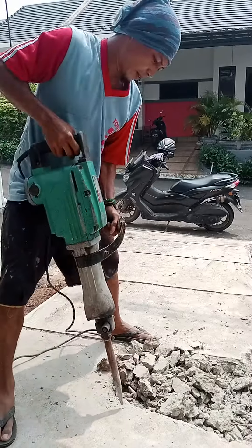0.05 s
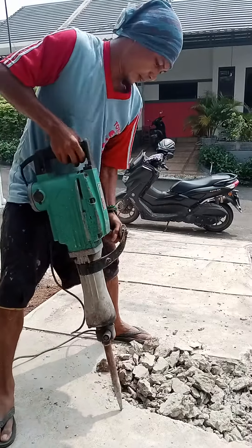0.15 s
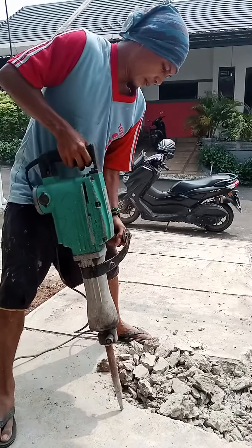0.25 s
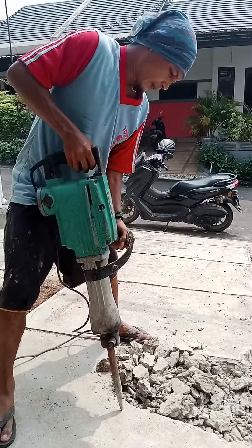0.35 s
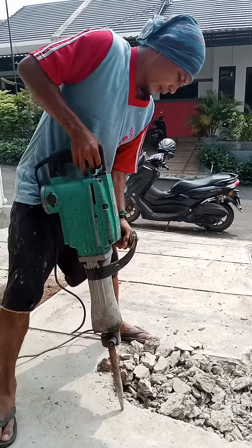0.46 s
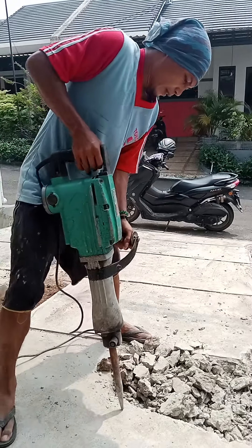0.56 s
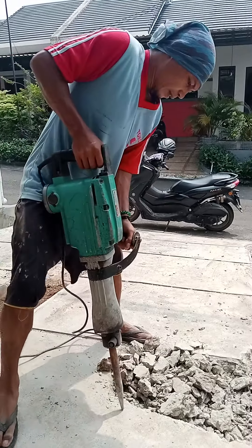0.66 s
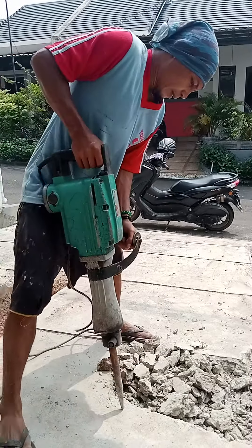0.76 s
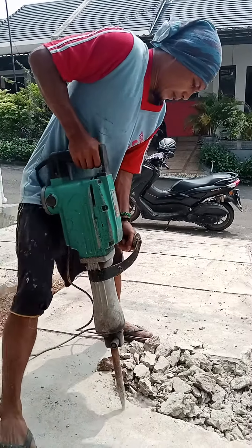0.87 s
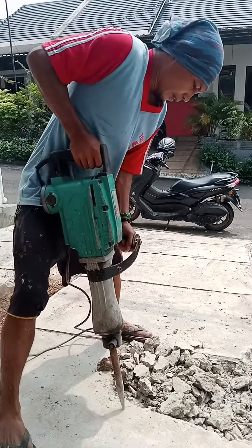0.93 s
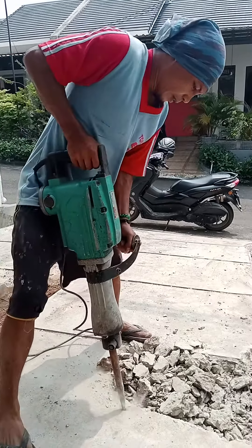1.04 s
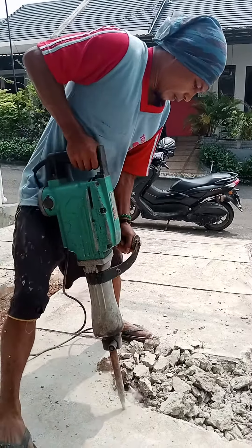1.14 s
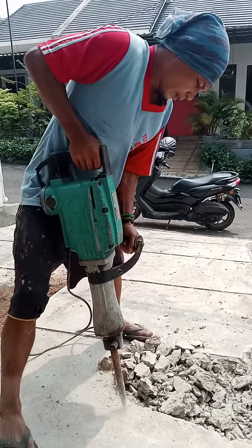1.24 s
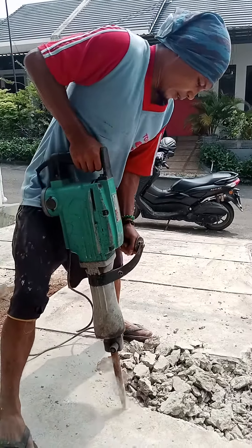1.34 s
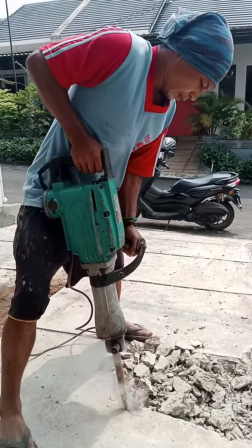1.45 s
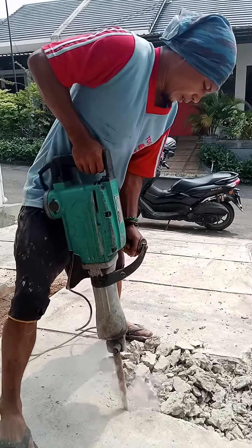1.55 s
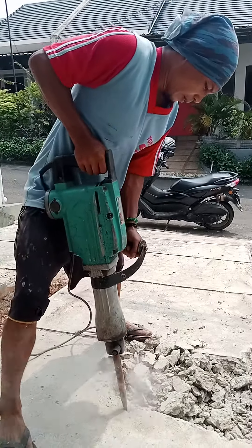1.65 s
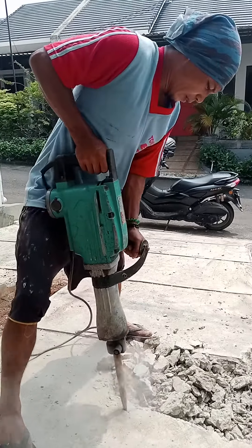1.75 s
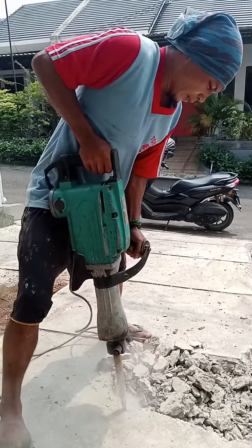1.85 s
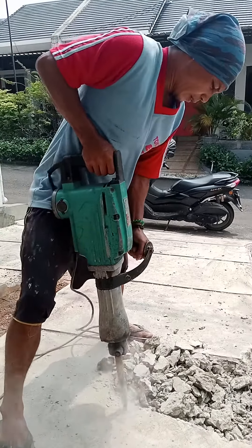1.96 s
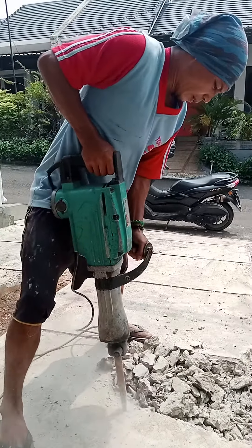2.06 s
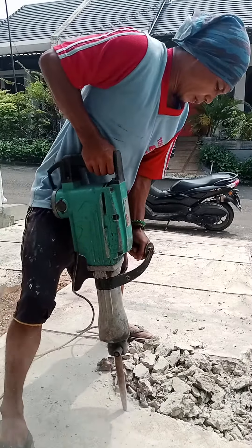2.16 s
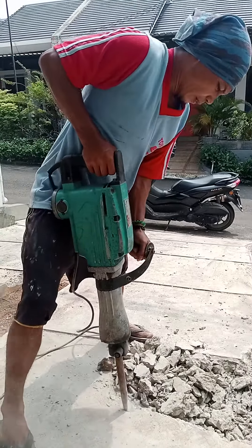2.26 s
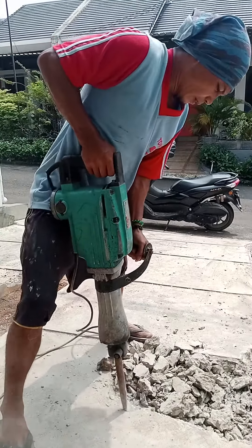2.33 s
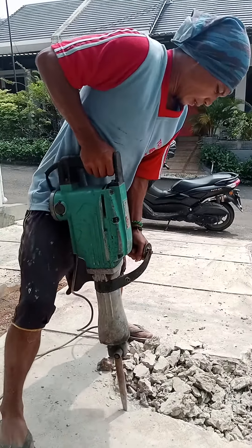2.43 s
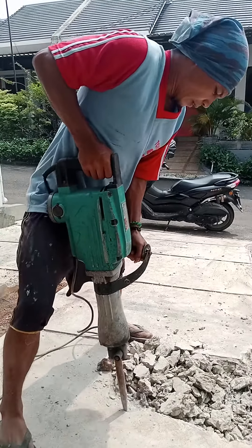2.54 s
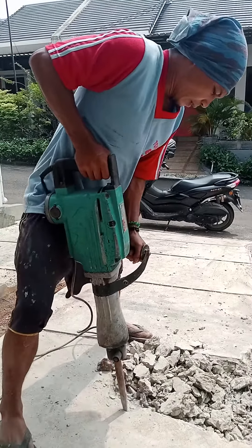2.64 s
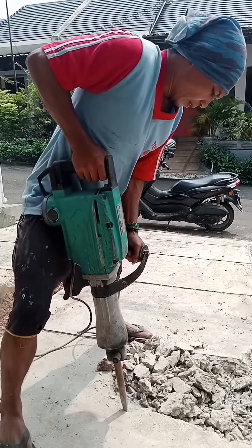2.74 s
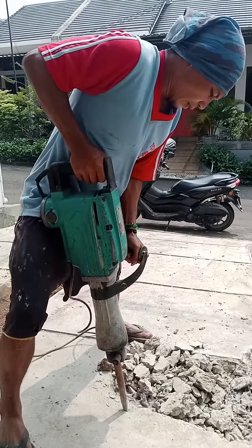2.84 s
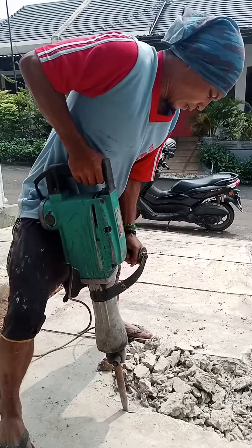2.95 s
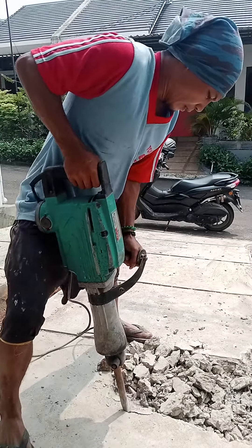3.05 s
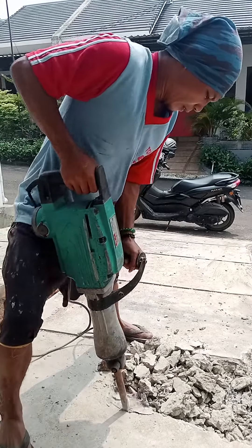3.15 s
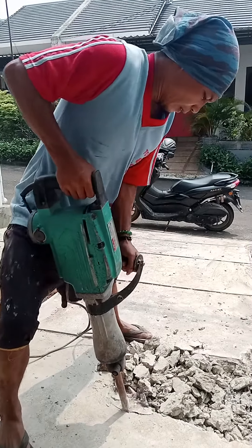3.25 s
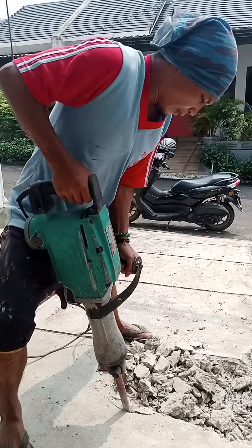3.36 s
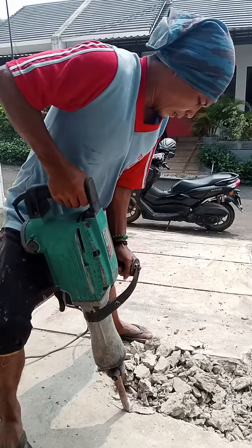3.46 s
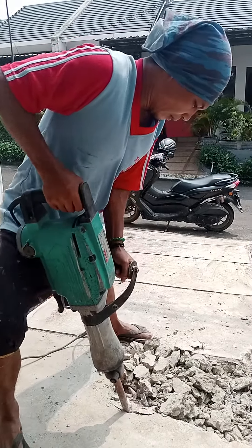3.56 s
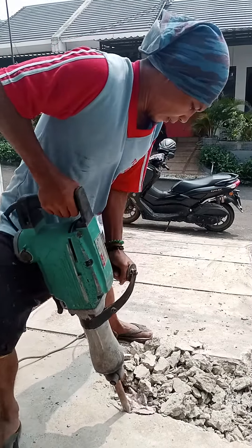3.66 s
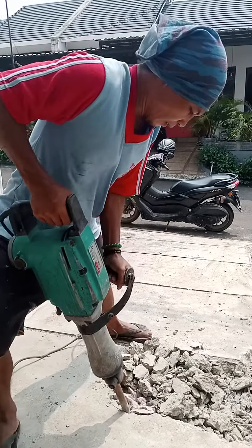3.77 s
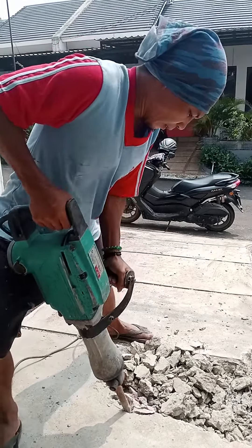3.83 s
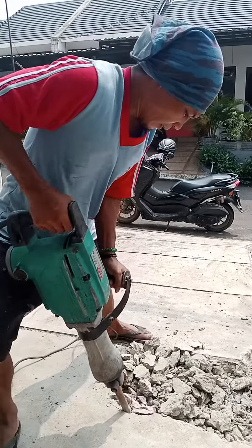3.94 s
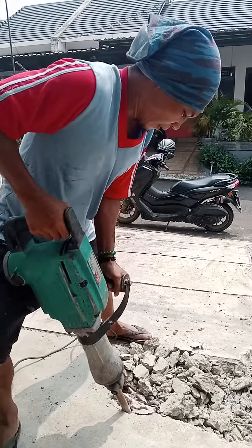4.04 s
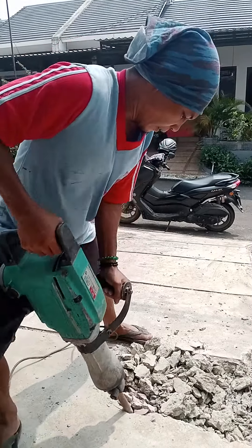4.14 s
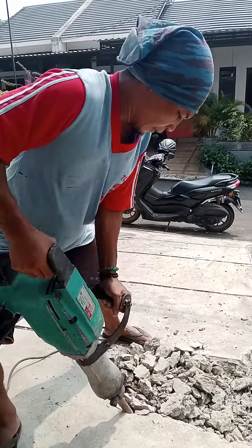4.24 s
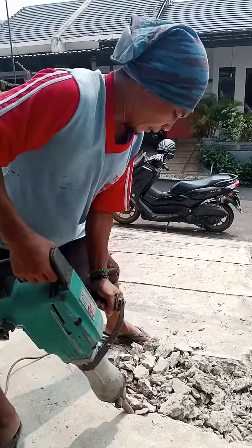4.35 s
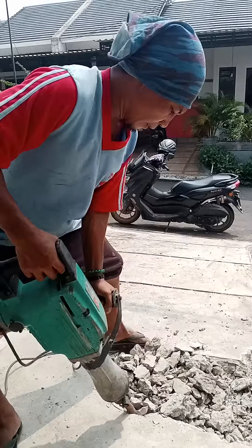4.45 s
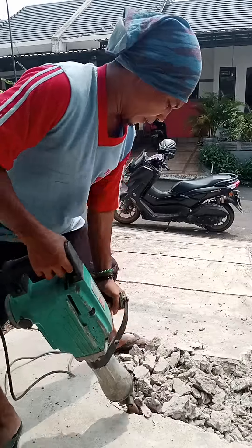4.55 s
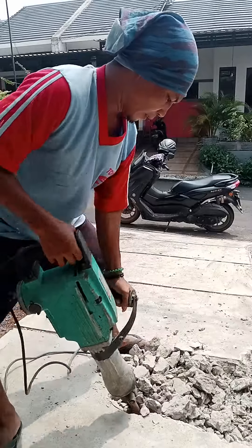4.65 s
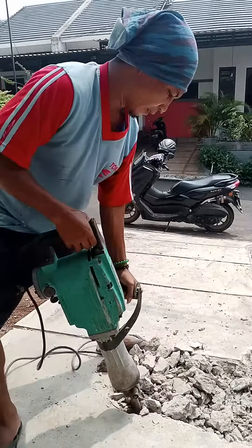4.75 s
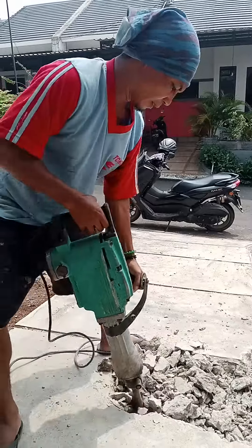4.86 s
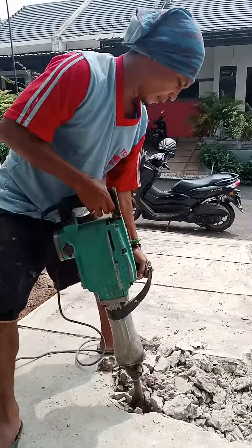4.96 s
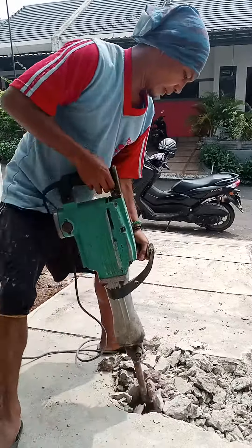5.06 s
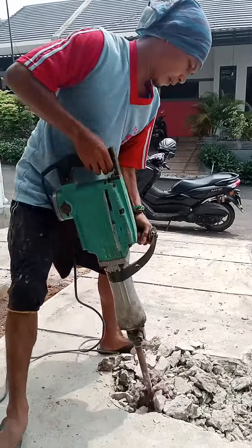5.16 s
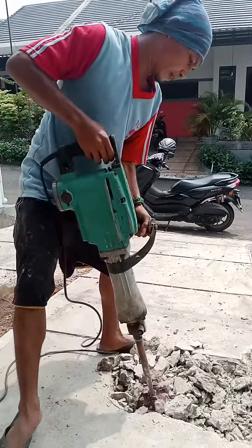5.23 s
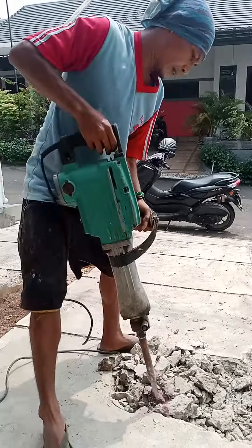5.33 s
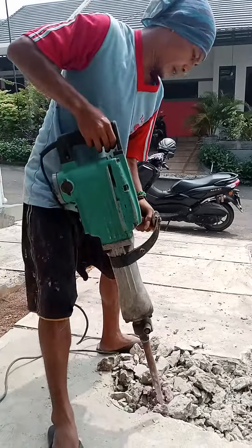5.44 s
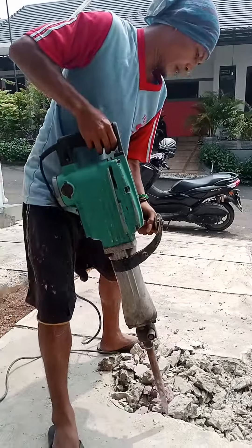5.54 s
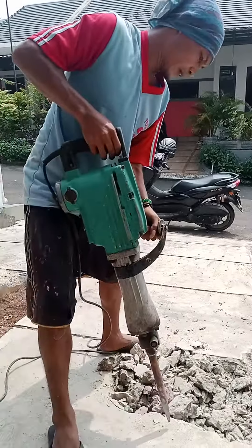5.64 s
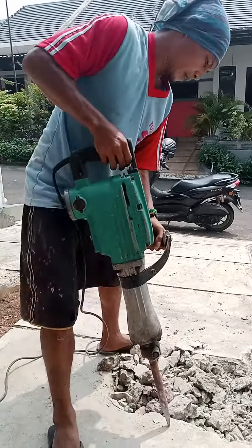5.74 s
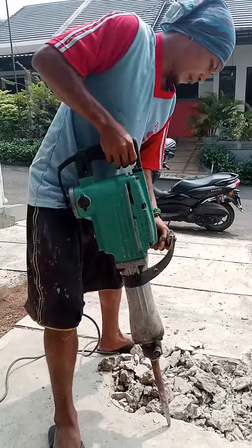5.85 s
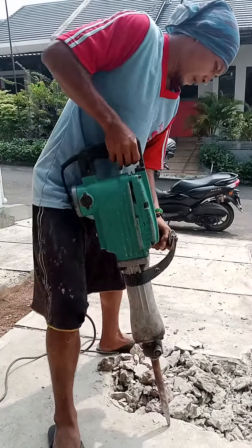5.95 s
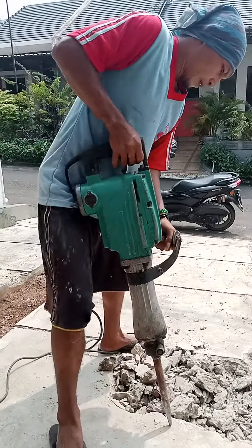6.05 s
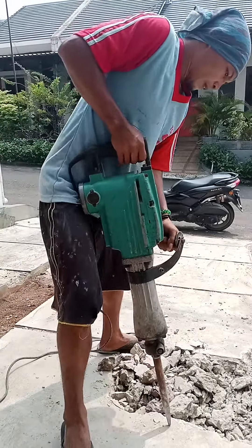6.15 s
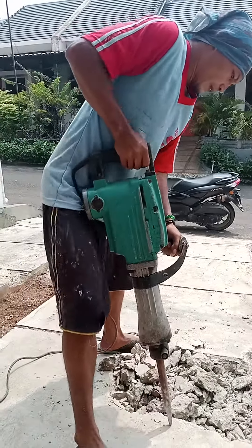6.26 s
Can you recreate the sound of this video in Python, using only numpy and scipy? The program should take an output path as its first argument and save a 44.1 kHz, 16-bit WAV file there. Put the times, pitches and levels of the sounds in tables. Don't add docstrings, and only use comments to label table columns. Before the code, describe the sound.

Close to the microphone, outdoors on a driveway between house walls, an electric demolition hammer works a concrete slab. From 0 to 1 s the motor growls unevenly while stray knocks, thuds and metallic ticks place the tip. From about 1.0 to 4.4 s it hammers continuously, roughly 22 blows a second rising to about 25: dull hollow slab knocks, bright jagged stone cracks, short high steel rings, gritty gear rattle and low ground hum. Around 3 s the ringing and knocks weaken, the blows get drier and a fuzzy gear whine rises, strongest near 4.1 s. From 4.4 to 5.1 s the piston coasts in irregular cracks and loose hollow clanks. A short scrape and sparse taps follow at 5.2-5.4 s, then near quiet. At 5.75 s the tip lands with a thump and metallic jolt; after another lull the motor restarts near 6.2 s with clatter and a heavy final knock.

```python
import sys
import numpy as np
from scipy import signal
from scipy.fft import rfft, irfft
from scipy.io import wavfile
from scipy.ndimage import uniform_filter1d

SR = 44100
rng = np.random.default_rng(int(sys.argv[2]) if len(sys.argv) > 2 else 0)


def pcm_store(signal):
    levels = np.round(np.clip(np.atleast_2d(signal), -1, 1) * 32767)
    wavfile.write(sys.argv[1], SR, levels.astype(np.int16).T)


def ratio_of_db(decibels):
    return 10 ** (np.asarray(decibels, float) / 20)


N = 277830

# (time [s], slab knock pitch [Hz], ground boom level [dB], barrel clatter level [dB])
TIP_DEPTH = [(.1, 680, -32, 1), (.45, 700, -32, 8), (.8, 675, -32, 1), (1.299, 847, -20, 1),
             (2.0, 895, -32, 2.5), (2.3, 864, -33, -0.5), (2.6, 873, -23, 0.5), (2.85, 650, -16, -1),
             (3.15, 650, -20.5, -1), (3.5, 675, -18, -1), (3.951, 640, -16.5, -2), (4.3, 800, -23, 0),
             (4.62, 780, -22, -2), (4.85, 730, -26, -4), (5.1, 695, -36, -4.5), (5.75, 710, -23.5, 5),
             (6.12, 740, -28, -14), (6.2, 730, -21, 5)]
# (time [s], strokes made [count])
PISTON_STROKES = [(1.026, 0), (1.1175, 2), (1.3425, 7), (1.4803, 10), (1.6078, 13), (1.964, 21),
                  (2.4904, 33), (2.8357, 41), (3.0765, 47), (3.2358, 51), (3.3898, 55), (3.7055, 63),
                  (3.901, 68), (4.054, 72), (4.2034, 76), (4.2843, 78), (4.3205, 79), (4.444, 82)]
# (time [s], crack level [dB], slab knock level [dB], chisel ring level [dB])
TIP_BITE = [(1.03, -11, -10.5, -22), (1.3, -9, -7, -31), (1.9, -8, -4.5, -27), (2.399, -9, -4, -29.5),
            (2.66, -13, -6, -25), (2.72, -12, -8.5, -35), (3.07, -13.5, -12, -44.5), (3.15, -13, -19, -32),
            (3.55, -10, -18, -43.5), (3.95, -13.5, -22.5, -39.5), (4.2, -11, -23.5, -46.5),
            (4.44, -10.5, -28, -43)]
# (pitch [Hz], share of motor [dB/dB], of lean [dB/dB], of slab knock [dB/dB],
# of barrel clatter [dB/dB], level when jolted [dB])
RATTLE_PARTS = [
    (230, .02, 0.5, 0.22, 0.093, 11),
    (433, 0.77, 0.28, 0.23, 0.64, 12.5),
    (1100, 0.76, 0.13, 0.29, 0.1, 0),
    (2540, 1, 0.018, 0.1, 0.49, 10),
    (6100, 1, 0.21, -0.058, 1, -7),
    (9500, 0.73, 0.12, -0.12, 0, -20),
    (13000, 0.81, 0.51, -0.074, 0.097, -36),
    (15200, .8, .1, -.1, 0.16, -38),
]


def evened(x):
    return x / np.sqrt(np.mean(x ** 2) + 1e-20)


def read(points, hz):
    f, value = np.transpose(points)
    return np.interp(np.log(hz + 1), np.log(f + 1), value)


def add(mix, s, sound):
    part = mix[round(s * SR):][:len(sound)]
    part += sound[:len(part)]


def resonate(x, hz, width_hz):
    turn = np.exp(2j * np.pi * np.cumsum(hz * np.ones(len(x))) / SR)
    r = np.exp(-np.pi * width_hz / SR)
    return 2 * (turn * signal.lfilter([1 - r], [1, -r], x / turn)).real


def ring(modes, t, spread_db, detune):
    hz, db, t60_s = np.transpose(modes)[:, :, None]
    luck = rng.standard_normal((2, len(modes), 1))
    level = ratio_of_db(db + spread_db * luck[0] - 60 * t / t60_s)
    return (level * np.sin(2 * np.pi * hz * (1 + detune * luck[1]) * t)).sum(0)


def rough(n, depth_db, size):
    return ratio_of_db(depth_db * evened(uniform_filter1d(rng.standard_normal(n), size=size)))


def blows():
    # (time [s], ring level [dB], lowest ring level [dB], free to ring [ms])
    jumps = [(.248, -17.5, -27, 110), (.927, -16.5, -37.5, 57), (.978, -24.5, -30.5, 47),
             (1.026, -16.5, -32.5, 11), (1.073, -14.5, -21.5, 15), (1.1175, -13, -16.5, 33),
             (1.163, -24, -24.5, 40), (1.208, -17.5, -38.5, 29), (1.252, -19.5, -26.5, 20),
             (1.297, -14, -24, 26), (1.342, -14.5, -34.5, 16), (1.388, -18.5, -29.5, 16),
             (1.481, -13.5, -23.5, 11), (1.523, -14.5, -21, 10), (1.566, -15, -29.5, 27),
             (1.608, -9.5, -23.5, 17), (1.652, -16, -28.5, 58), (1.696, -15, -40.5, 26),
             (1.74, -18, -23.5, 35), (1.786, -18.5, -29, 9.4), (1.829, -17.5, -16, 21),
             (1.919, -12.5, -27.5, 14), (1.964, -13.5, -15, 13), (2.008, -13, -9.5, 19),
             (2.052, -15.5, -30.5, 11), (2.139, -20.5, -23.5, 24), (2.183, -22, -28.5, 24),
             (2.226, -15, -21, 18), (2.271, -30, -30.5, 7.7), (2.358, -15, -18, 12), (2.447, -42, -31, 10),
             (2.534, -21, -30.5, 10), (2.577, -21.5, -38.5, 14), (2.663, -21.5, -15.5, 13),
             (4.361, -17, -29, 5.7), (4.679, -32, -40, 14), (4.765, -35, -43, 30), (5.74, -37, -36, 26)]
    # (time [s], crack level [dB], slab knock level [dB], ground boom level [dB])
    placing = [(0.013, -21, -95, -38), (0.065, -28.5, -51, -47), (0.083, -28, -42, -52),
               (0.099, -25, -38, -55), (.11, -37, -50, -54), (0.121, -28, -57, -55),
               (0.157, -36, -19, -19.5), (0.192, -28, -36, -53), (0.2207, -19, -47, -47),
               (0.248, -20, -14, -19.5), (0.336, -21, -18.5, -6.5), (0.426, -18.5, -18.5, -15),
               (0.438, -28, -16, -52), (0.444, -25.5, -46, -40), (0.4526, -36, -29, -25),
               (0.4808, -23.5, -27.5, -19), (0.5222, -23, -26.5, -11.5), (0.6065, -37, -55, -27.5),
               (0.684, -36, -57, -37.5), (0.7653, -14.5, -32.5, -27), (0.787, -14, -11.5, -18),
               (0.818, -15, -26.5, -24.5), (0.8702, -10.5, -18.5, -22.5), (0.9266, -13.5, -10.5, -21),
               (0.978, -10.5, -15, -19), (1.051, -37.5, -43, -43)]
    # (time [s], crack level [dB], knock level [dB], boom level [dB])
    coasting = [(4.49, -10, -19, -40), (4.5452, -10, -20, -33), (4.5844, -17, -45, -75),
                (4.605, -12.5, -24.5, -23.5), (4.655, -16, -24, -48), (4.679, -13, -36, -37),
                (4.7644, -14, -29, -32), (4.802, -26, -22.5, -25), (4.8775, -12.5, -33, -78),
                (4.9488, -19, -29, -30.5), (4.993, -20, -29, -42), (5.0235, -18, -30, -36),
                (5.04, -36, -37, -49), (5.061, -41, -40, -53), (5.1828, -32, -30, -54),
                (5.275, -36, -48, -52), (5.332, -35.5, -43, -57), (5.718, -36, -65, -49.5),
                (5.74, -34.5, -17.5, -15.5), (5.766, -21.5, -17.5, -15), (5.821, -35, -37, -57),
                (5.9514, -55, -73.5, -53), (6.1200, -48, -69, -63), (6.206, -25, -43, -46),
                (6.212, -20, -26.5, -35), (6.235, -19, -27, -43), (6.2901, -23, -22.5, -6.5)]
    crack_scatter_db, knock_scatter_db, ring_scatter_db, low_scatter_db = 1.0, .9, 2, 2.5
    low_ring_db, stray_ring_db = 1, -53.5
    least_free_ms, free_ms_per_db, free_scatter = 8.0, .6, .3

    s, made = np.transpose(PISTON_STROKES)
    at = np.interp(np.arange(made[-1] + 1), made, s)
    s, *bite = np.transpose(TIP_BITE)
    crack_db, knock_db, ring_db = (np.interp(at, s, column) for column in bite)
    luck = rng.standard_normal((len(at), 5)).T
    free_ms = least_free_ms + free_ms_per_db * (ring_db - ring_db.min())
    s, hz, boom_db, barrel_db = np.transpose(TIP_DEPTH)
    strokes = np.transpose([
        at,
        crack_db + crack_scatter_db * luck[0],
        knock_db + knock_scatter_db * luck[1],
        np.interp(at, s, boom_db),
        ring_db + ring_scatter_db * luck[2],
        ring_db + low_ring_db + low_scatter_db * luck[3],
        free_ms * np.exp(free_scatter * luck[4])])
    strays = [(t, c, k, b, c + stray_ring_db, c + stray_ring_db + low_ring_db, least_free_ms)
              for t, c, k, b in [*placing, *coasting]]
    rows = np.vstack([strokes, strays])
    rows = rows[np.argsort(rows[:, 0])]
    for t, *jump in jumps:
        rows[abs(rows[:, 0] - t).argmin(), 4:] = jump
    return np.c_[rows, np.interp(rows[:, 0], s, hz), np.interp(rows[:, 0], s, barrel_db)]


def until_blow():
    t = np.arange(N) / SR
    at = np.r_[np.transpose(blows())[0], N / SR + 1]
    return at[np.searchsorted(at, t)] - t


def swells(t):
    # (time [s], level [dB])
    motor = [(.015, 5), (.055, 10.5), (.064, -3), (.075, 11.5), (.16, 5.5), (.23, 5.5), (.245, -13),
             (.3, 2), (.42, -13), (.44, 2), (.47, -4.5), (.64, -9), (.68, -11), (.70, -3), (.74, -10),
             (.76, 3), (.83, 6.5), (1.1, 1), (4.2, 9), (4.9, 5), (5.14, 7), (5.19, 1), (5.3, 2.5),
             (5.325, -6), (5.34, 0.5), (5.385, 4), (5.53, -38.5), (5.7, -20.5), (6.03, -42), (6.115, -31),
             (6.125, -20), (6.165, -11), (6.175, -6), (6.2, -1.5), (6.3, 15)]
    # (time [s], level [dB])
    lean = [(.14, -22), (.18, -8), (.4, 23), (.55, -7), (.64, -34), (.75, -23), (.9, 18), (1.3, 19),
            (2.2, 14.5), (3.8, 27), (4.5, 5), (5.14, 1.5), (5.2, -14), (5.53, -25.5), (5.62, -26),
            (6.0, -20), (6.19, -30.5), (6.3, -3)]
    jolt_s, rise_db_per_s, fall_db_per_s = 5.79, 602, 260
    s, _, knock_db, _ = np.transpose(TIP_BITE)
    depth_s, _, _, barrel_db = np.transpose(TIP_DEPTH)
    controls = [np.interp(t, *np.transpose(motor)),
                np.interp(t, *np.transpose(lean)),
                np.interp(t, s, knock_db - np.mean(knock_db)),
                np.interp(t, depth_s, barrel_db)]
    parts = np.array(RATTLE_PARTS)
    driven_db = parts[:, 1:5] @ controls
    jolt_db = np.minimum(rise_db_per_s * (t - jolt_s), fall_db_per_s * (jolt_s - t)) + parts[:, 5:]
    return 10 * np.log10(ratio_of_db(2 * driven_db) + ratio_of_db(2 * np.maximum(jolt_db, -200)))


def running():
    # (frequency [Hz], density [dB per Hz])
    rattle = [(35, -30.5), (60, 1), (234, -4.5), (961, -10), (1990, -8.5), (2830, -12.5), (6600, -12.5),
              (10600, -28), (13700, -39.5), (16500, -39)]
    # (frequency [Hz], width [Hz], level [dB])
    hollows = [(142, 8.3, 6.5), (650, 81, 0.5), (3640, 330, -3.5), (5610, 310, 2), (6470, 66, 6),
               (12430, 300, -9.5), (294, 72, 0.5), (15100, 1400, -4.5)]
    frames, hz = N // 128 + 5, np.fft.rfftfreq(512, 1 / SR)
    a, b, patches = rng.standard_normal((frames, 257, 3)).T
    patches = uniform_filter1d(patches, size=9, axis=1)
    patches = evened(uniform_filter1d(patches, size=4, axis=0))
    levels_db = swells(np.arange(frames) * 128 / SR)
    part_hz = np.transpose(RATTLE_PARTS)[0]
    share = np.array([read(list(zip(part_hz, row)), hz) for row in np.eye(len(levels_db))])
    patch_db = 2.13 * patches * np.clip(hz / 1000, 0, 1)[:, None]
    z = (a + 1j * b) * ratio_of_db(read(rattle, hz)[:, None] + share.T @ levels_db + patch_db)
    noise = signal.istft(z, nperseg=512, noverlap=384)[1][:N]
    noise = noise + sum(ratio_of_db(db) * resonate(noise, f, width) for f, width, db in hollows)
    noise *= ratio_of_db(-27.5) / np.std(noise[N // 2:][:SR // 2])
    return noise * evened(rough(N, 2.1, size=90))


def brushes():
    # (start [s], end [s], level [dB])
    sparking = [
        (0, .2, -54),
        (.75, .87, -52),
        (6.168, 6.296, -47.5),
    ]
    hz, width_hz = 15200, 1400
    out = np.zeros(N)
    for s0, s1, db in sparking:
        n = round((s1 - s0) * SR)
        fizz = resonate(resonate(rng.standard_normal(n), hz, width_hz), hz, width_hz)
        add(out, s0, ratio_of_db(db) * evened(fizz) * signal.windows.tukey(n, .1))
    return out


def cracks():
    # (frequency [Hz], density [dB per Hz])
    stone = [(710, -35.5), (1200, -9), (1900, -6.5), (2700, -8.5), (4100, -7), (5050, -4), (6790, -1),
             (8360, -4.5), (10600, -19), (13500, -18.5), (14600, -13.5), (16100, -15.5), (16700, -46.5)]
    # (frequency [Hz], level [dB], t60 [s])
    clank_modes = [(5090, 3.5, 0.019), (8150, -5.5, 0.0075)]
    # (time [s], pitch [Hz], level [dB])
    seating = [
        (2.0, 6700, -10.5),
        (2.3, 5880, 4.5),
        (2.7, 5880, 7.5),
        (2.95, 6600, -15.5),
    ]
    # (time [s], level [dB])
    spark = [(.05, 5), (.22, 6), (.76, -27.5), (.83, -12), (.87, 7), (2.5, 3), (3.2, 3.5), (4.55, 5),
             (4.585, -14), (4.604, 3.5), (4.655, -6), (4.679, 2.5), (4.88, -2), (4.95, 16.5), (5.0, 1.5),
             (5.72, -5), (5.77, -8), (5.82, -14), (6.12, 34), (6.2, -22)]
    dulling = 0.5
    loose_clank = 0.41

    hz = np.fft.rfftfreq(N, 1 / SR)
    colour = rfft(rng.standard_normal(N)) * ratio_of_db(read(stone, hz))
    edge = np.clip((hz - 8500) / 2000, 0, 1)
    barrel = np.clip((4800 - hz) / 500, 0, 1)
    noise = np.array([irfft(colour * part, N) for part in (1 - edge - barrel, edge, barrel)])
    seat_s, *seat = np.transpose(seating)
    t, shape, clanks = np.arange(1800) / SR, np.zeros((3, N)), np.zeros(N)
    for s, crack_db, _, boom_db, *_, barrel_db in blows():
        spread, sharp, hollow = rng.standard_normal(3)
        load = np.clip(ratio_of_db(0.12 * (boom_db + 39.5)), .55, 1)
        fall_s = 0.002 * np.exp(0.18 * spread) * load
        decay = np.exp(-(t / fall_s) ** 2 / 2) + ratio_of_db(-5.5) * np.exp(-t / (2.4 * fall_s))
        burst = ratio_of_db(crack_db - 8.0) * (1 - np.exp(-t / (0.82 * fall_s))) * decay
        edge_db = sharp + np.interp(s, *np.transpose(spark)) + dulling * min(crack_db, 0)
        add(shape[0], s - .0003, burst)
        add(shape[1], s - .0003, burst * ratio_of_db(edge_db))
        add(shape[2], s - .0003, burst * ratio_of_db(barrel_db + 1.1 * hollow))
        seat_mode = (*(np.interp(s, seat_s, column) for column in seat), .035)
        clank_db = crack_db - 7 + loose_clank * np.clip(-46.0 - boom_db, 0, 12)
        clank = ring([*clank_modes, seat_mode], t, spread_db=-2.5, detune=0.018)
        add(clanks, s + .0003, ratio_of_db(clank_db) * clank)
    shape[1:] = uniform_filter1d(shape[1:], size=100, axis=1)
    jagged = rough(N, 0.78, size=24)
    chips = (rng.random(N) < 70 / SR) * rng.exponential(1, N) * uniform_filter1d(shape[0], size=3000)
    shape = shape + ratio_of_db(-6.0) * signal.oaconvolve(chips, np.exp(-t[:300] / 0.0032))[:N]
    return (shape * evened(noise)).sum(0) * np.sqrt(3) * evened(jagged) + clanks


def chisel():
    # (frequency [Hz], level [dB], t60 [s])
    high_modes = [(2710, -18, .06), (5950, -18, .1), (7050, -6, .14), (7180, 0, .14), (7240, -8, .1),
                  (9790, -19, .13), (9945, -12.5, .12)]
    low_modes = [(4895, -1, 0.12), (5110, -7, 0.06), (5300, -12, 0.04)]
    collar_modes = [(7958, -16, .14)]
    casing_modes = [(1184, 0, .14), (2223, -20, .12), (2710, -9, .06), (3214, -12, .19), (3591, -14, .2),
                    (3994, -21, .2), (4700, -15, .24), (5109, -17, .24), (5243, -8, .13), (5879, -20, .2),
                    (7391, -20, .18), (8100, -18, .2), (10550, -28, .12), (12480, -22, .05)]
    # (time [s], level [dB])
    bump = (5.764, -26)
    out, t = np.zeros(N), np.arange(4000) / SR
    for s, _, _, _, ring_db, low_db, free_ms, *_ in blows():
        landed_s = np.maximum(t - free_ms / 1000, 0)
        damping = np.exp(-landed_s / 0.00071) + ratio_of_db(-24) * np.exp(-landed_s / .015)
        free = (1 - np.exp(-t / 0.0014)) * damping
        high = ratio_of_db(ring_db + 2.5) * ring(high_modes, t, spread_db=1.8, detune=0.0015)
        low = ratio_of_db(low_db) * ring(low_modes, t, spread_db=2.5, detune=.003)
        collar = ratio_of_db(ring_db + 7.5) * ring(collar_modes, t, spread_db=3.0, detune=0.0006)
        add(out, s + .0006, free * (high + low) + collar)
    bump_s, bump_db = bump
    casing = ring(casing_modes, np.arange(SR // 3) / SR, spread_db=0, detune=0)
    add(out, bump_s, ratio_of_db(bump_db) * casing * rough(SR // 3, 4, size=150))
    chatter = evened(uniform_filter1d(rng.standard_normal(N), size=110))
    return out * ratio_of_db(2.2 * chatter - .5)


def slab():
    # (frequency [Hz], level [dB], t60 [s])
    slab_modes = [(622.6, -8, 0.05), (677, 6, 0.029), (750.3, -5, 0.038), (841, 4, 0.021), (900, -14, 0.02),
                  (1049, -10, 0.041), (1165, -19.5, 0.056), (1255, -15.5, 0.1), (1404, -20, 0.035),
                  (1570, -2.5, 0.021), (1720, -9, 0.062)]
    ground_modes = [(161, -12.5, 0.25), (211, 10.5, 0.026), (101, -15.5, 0.083)]
    # (delay [s], level [dB])
    walls = [
        (.012, -13.5),
        (0.0197, -29),
    ]
    rebound_s, rebound_scatter, rebound_db = .018, 0.16, -14
    knocks, booms = np.zeros(N), np.zeros(N)
    t, long_t = np.arange(2600) / SR, np.arange(5500) / SR
    for s, _, knock_db, boom_db, _, _, _, hz, _ in blows():
        hz = hz * np.exp(0.035 * rng.standard_normal())
        u = hz * (t - .0015)
        cycles = np.where(u < 0, .45, .5 * (850 / hz) ** 3.7)
        pulse = -np.cos(2 * np.pi * u) * np.exp(-(u / cycles) ** 2)
        modes = [(f, db - 1.2 * max(f - 800, 0) / hz * 850 / hz, t60_s) for f, db, t60_s in slab_modes]
        rings = ratio_of_db(-13.0) * ring(modes, t, spread_db=2.0, detune=0.023)
        rings = rings * (1 - np.exp(-t / 0.0022)) * rough(len(t), 2.8, size=60)
        add(knocks, s - .0017, ratio_of_db(knock_db + 3.5) * (pulse + rings))
        back_s = s + rebound_s * np.exp(rebound_scatter * rng.standard_normal())
        add(knocks, back_s, ratio_of_db(knock_db + rebound_db + rng.standard_normal()) * pulse)
        shake = (1 - np.exp(-long_t / 0.0034)) * ring(ground_modes, long_t, spread_db=3.0, detune=0.016)
        add(booms, s + 0.0012, ratio_of_db(boom_db - 1.0) * shake)
    echoed = knocks + booms
    for delay_s, db in walls:
        add(echoed, delay_s, ratio_of_db(db) * knocks)
    return echoed


def whines():
    # (start [s], end [s], start pitch [Hz], end pitch [Hz],
    # level [dB])
    singing = [(.014, .066, 670, 650, -34.5), (.064, .155, 690, 570, -35.5), (.06, .14, 710, 690, -42),
               (5.085, 5.14, 700, 540, -38.5), (5.17, 5.47, 650, 700, -53), (6.2, 6.3, 640, 670, -41),
               (5.42, 5.59, 835, 820, -68), (5.58, 5.73, 695, 680, -60), (5.57, 5.63, 650, 590, -62),
               (2.6, 3.15, 3550, 3650, -42), (.69, .75, 1000, 1150, -52), (5.1, 5.16, 5300, 5500, -44),
               (5.125, 5.17, 800, 600, -49), (5.62, 5.72, 1950, 1650, -63), (5.4, 6.2, 150, 148, -57),
               (5.4, 6.2, 192, 188, -57), (.285, .335, 12430, 12430, -45), (4.505, 4.55, 12430, 12430, -48),
               (4.59, 4.625, 12430, 12430, -47), (4.66, 4.685, 12430, 12430, -44),
               (4.712, 4.775, 12430, 12430, -46), (4.785, 4.87, 12430, 12430, -49),
               (4.766, 4.86, 7950, 7950, -45), (4.878, 4.92, 7950, 7950, -43), (5.1, 5.17, 340, 230, -48)]
    # (time [s], pitch [Hz], level [dB])
    gear = [
        (2.702, 1720, -57.5),
        (3.1, 1860, -34),
        (3.6, 1930, -33.5),
        (4.1, 2050, -28.5),
        (4.3, 2170, -42),
    ]
    blur = 1.5
    clean_share, clean_below_hz = .6, 900
    out = np.zeros(N)
    for s0, s1, hz0, hz1, db in singing:
        n = round((s1 - s0) * SR)
        glide_hz, width_hz = np.linspace(hz0, hz1, n), blur * np.sqrt(hz0)
        fuzzy = resonate(resonate(rng.standard_normal(n), glide_hz, width_hz), glide_hz, width_hz)
        plain = np.sqrt(2) * np.sin(2 * np.pi * np.cumsum(glide_hz) / SR)
        clean = clean_share * (hz0 < clean_below_hz)
        tone = (1 - clean) * evened(fuzzy) + clean * plain
        add(out, s0, ratio_of_db(db) * evened(tone) * signal.windows.tukey(n, .3))
    s, hz, db = np.transpose(gear)
    t = np.arange(N) / SR
    loaded = np.exp(-((until_blow() - .005) / 0.0032) ** 2) + 0.21
    tone = evened(resonate(rng.standard_normal(N), np.interp(t, s, hz), 50))
    return out + loaded * tone * ratio_of_db(np.interp(t, s, db, -120, -120) + 0.5)


def clatter():
    # (time [s], level [dB], pitch [Hz], t60 [s])
    taps = [(.084, -21, 2890, 0.025), (0.099, -29, 2840, .02), (0.112, -27, 2780, 0.014),
            (0.191, -21.5, 1684, 0.052), (0.3804, -26, 2230, 0.033), (0.394, -26, 1800, 0.015),
            (.432, -18.5, 3600, .02), (4.505, -23, 5000, .02), (4.582, -22, 1700, 0.021),
            (4.742, -28.5, 1720, 0.071), (4.753, -32, 2400, 0.027), (4.806, -29, 2250, 0.11),
            (4.8482, -25.5, 2240, 0.04), (4.904, -31, 2340, 0.039), (4.9487, -24, 2000, 0.032),
            (4.9734, -24.5, 1940, 0.042), (4.996, -23, 2440, 0.026), (4.992, -30, 5410, 0.033),
            (4.8778, -33, 4800, 0.011), (4.6038, -35, 4740, 0.018), (.7653, -24, 6100, 0.014),
            (0.818, -30, 5700, .015), (0.916, -15, 5700, 0.016), (.658, -38, 1900, .03),
            (5.692, -53, 2400, 0.017), (5.0254, -18, 1770, 0.02), (5.038, -25, 2480, 0.028),
            (5.0592, -26.5, 1970, 0.027), (5.1125, -33, 2200, 0.11), (5.1815, -28.5, 1730, 0.048),
            (5.209, -29, 1870, .03), (5.252, -34, 1670, 0.045), (5.3331, -23, 1920, .02),
            (5.3539, -36.5, 1503, 0.097), (5.717, -28.5, 2000, 0.023), (5.819, -32, 2250, 0.026),
            (5.836, -38, 2080, .025), (6.1192, -57.5, 1720, 0.056), (6.1534, -45, 1900, 0.022),
            (6.1862, -37, 2140, 0.035), (6.2086, -11, 4270, 0.017), (6.234, -29, 4470, .02),
            (6.2713, -13, 2050, 0.028)]
    # (multiple of the pitch [ratio], level [dB])
    tap_shape = [(0.799, -9.5), (1, 1.5), (1.3, -5), (1.75, -5), (2.4, -7), (3, -11)]
    out, t = np.zeros(N), np.arange(3000) / SR
    for s, db, hz, t60_s in taps:
        modes = [(k * hz, part_db, t60_s) for k, part_db in tap_shape]
        tap = ring(modes, t, spread_db=4.5, detune=0.021) * (1 - np.exp(-t / 0.0011))
        add(out, s, ratio_of_db(db) * tap)
    contact = uniform_filter1d(uniform_filter1d(rng.standard_normal(N), size=50), size=50)
    return out * evened(contact + .1)


def scrapes():
    # (start [s], end [s], level [dB])
    drags = [
        (0.683, 0.735, -47),
        (5.342, 5.417, -46.5),
    ]
    out = np.zeros(N)
    for s0, s1, db in drags:
        n = round((s1 - s0) * SR)
        hiss = np.diff(rng.standard_normal(n + 1)) * signal.windows.tukey(2 * n, .35)[n:]
        add(out, s0, ratio_of_db(db) * hiss)
    return out


def shudder():
    # (frequency [Hz], level [dB])
    response = [(55, -23), (105, -14.5), (135, 0), (155, -1.5), (180, -7), (215, -8.5), (290, -7),
                (345, -16)]
    # (time [s], level [dB])
    press = [(1.03, -51), (1.2, -45.5), (1.7, -41.5), (2.0, -43), (2.15, -35), (2.9, -40.5), (3.45, -38.5),
             (3.7, -46), (3.85, -35.5), (4.15, -45.5), (4.4, -59.5)]
    t, (s, made), orders = np.arange(N) / SR, np.transpose(PISTON_STROKES), np.arange(3, 15)
    turns, slow_t = np.interp(t, s, made), t[::512]
    rate_hz = uniform_filter1d(np.gradient(turns) * SR, size=4000)[::512]
    drift = uniform_filter1d(rng.standard_normal((len(slow_t), len(orders))), size=14, axis=0)
    press_db = np.interp(slow_t, *np.transpose(press), -120, -120)
    out = np.zeros(N)
    for k, d in zip(orders, drift.T):
        level = ratio_of_db(press_db + 1.5 + read(response, k * rate_hz) + 4.7 * evened(d))
        out += np.interp(t, slow_t, level) * np.sin(2 * np.pi * (k * turns + rng.random()))
    return out


def yard(x):
    taps = np.zeros(SR // 2)
    at = np.arange(300, len(taps) - 22, 22)
    taps[at + rng.integers(0, 22, len(at))] = rng.choice([-1., 1.], len(at))
    hz, t, z = signal.stft(taps, SR, nperseg=256)
    t60_s = read([(200, 0.21), (2000, 0.31), (12000, 0.2)], hz)[:, None]
    tail = signal.istft(z * ratio_of_db(-60 * t / t60_s), SR, nperseg=256)[1]
    return signal.fftconvolve(x, tail / np.linalg.norm(tail))[:N]


def scene():
    hits = cracks() + chisel() + slab() + clatter()
    machine = running() + shudder() + whines() + scrapes() + brushes()
    return (hits + ratio_of_db(-11.5) * yard(hits) + machine)[None]


def band_limit(x):
    return signal.sosfilt(signal.butter(12, 16990, fs=SR, output="sos"), x)


def record(dry):
    edge_hz, leak_db = 15780, -25
    soft = .62 * np.tanh(dry / .62)
    soft = signal.sosfilt(signal.butter(N=4, Wn=70, btype="high", fs=SR, output="sos"), soft)
    low = signal.oaconvolve(soft, signal.firwin(numtaps=401, cutoff=edge_hz, fs=SR)[None], "same")
    mix = low + ratio_of_db(leak_db) * (soft - low)
    return band_limit(mix)


dry = scene()
out = record(dry)
pcm_store(out)
```